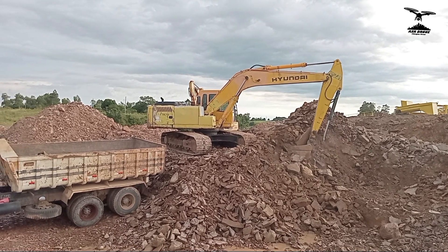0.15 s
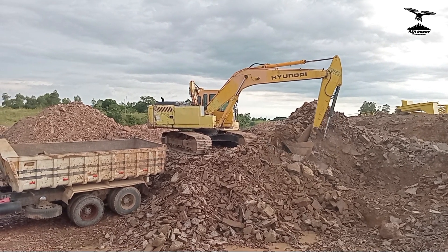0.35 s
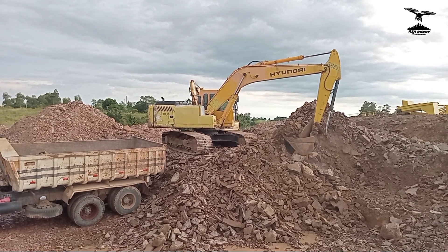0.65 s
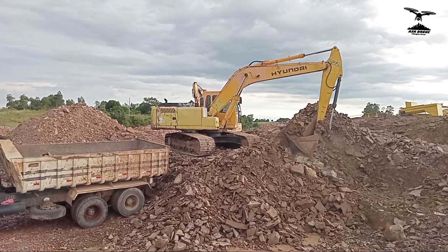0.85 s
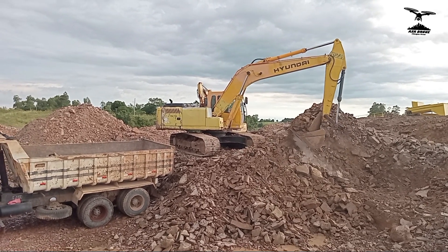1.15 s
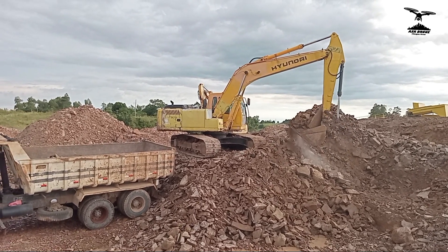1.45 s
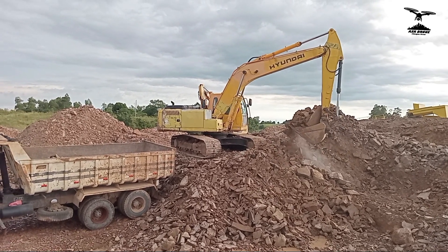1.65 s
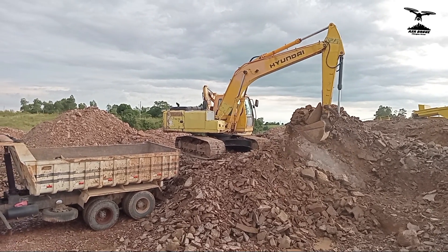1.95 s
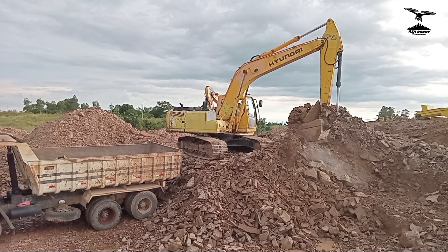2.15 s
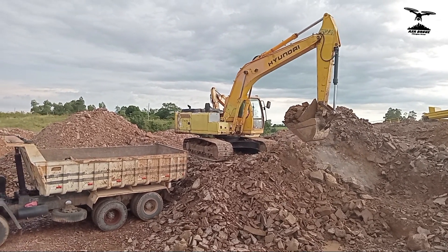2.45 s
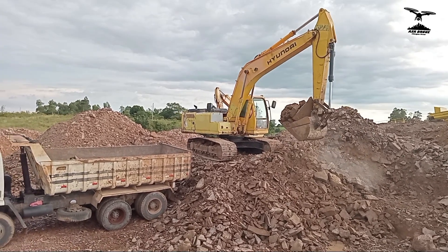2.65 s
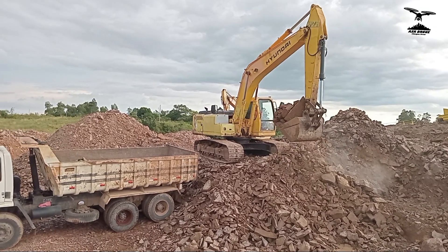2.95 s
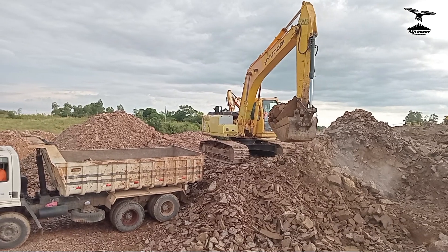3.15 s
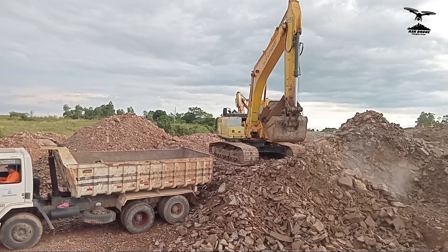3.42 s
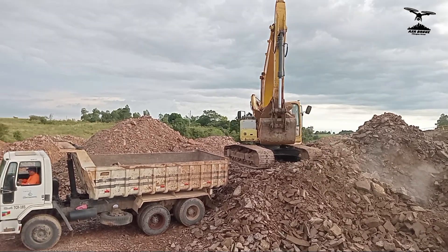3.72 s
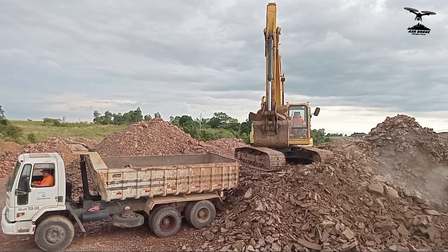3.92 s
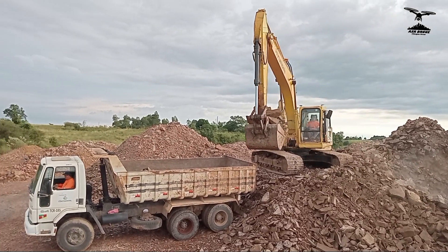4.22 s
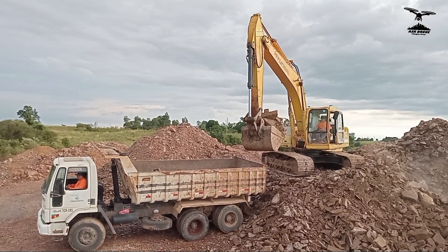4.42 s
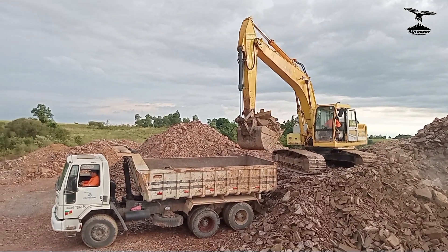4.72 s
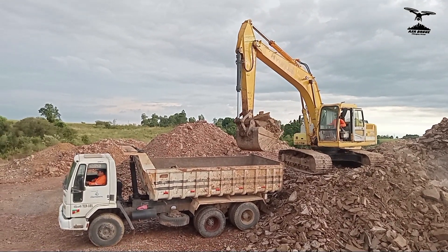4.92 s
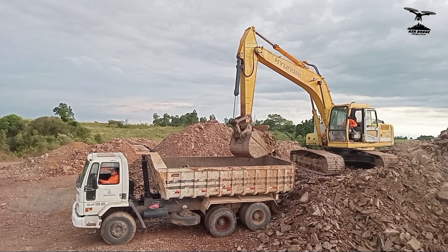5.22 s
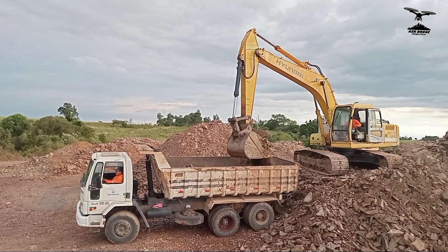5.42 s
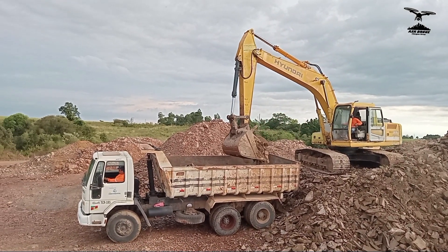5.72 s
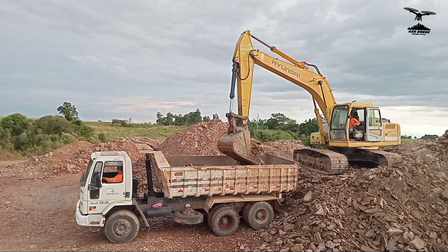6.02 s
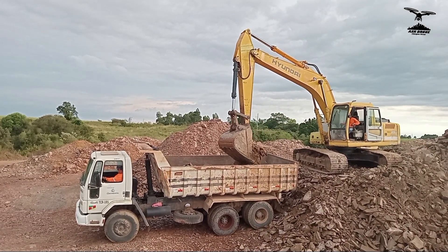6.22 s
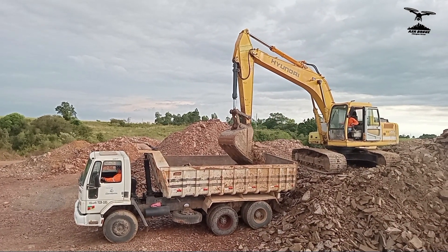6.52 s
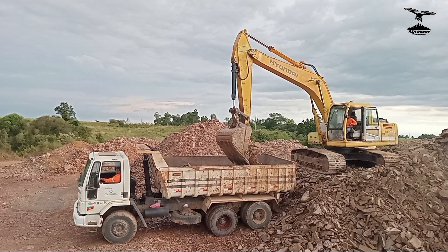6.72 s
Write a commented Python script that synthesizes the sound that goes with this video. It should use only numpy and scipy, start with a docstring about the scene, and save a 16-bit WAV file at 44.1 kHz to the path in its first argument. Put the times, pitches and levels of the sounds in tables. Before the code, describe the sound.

A mono, fairly distant outdoor view of a quarry, with a short ground echo and brief scatter off rock. From 0 s a dull, lumpy diesel rumble with an unsteady low hum and thin hydraulic whine lies beneath gravel trickling and stones shifting in a ringing steel bucket. A sharp clink comes at 0.6 s, more clinks and cracks around 0.9-1.2 s, then a dense bright flurry at 2.25-2.45 s. The whine fades by about 2.9 s; spilling thins to isolated clicks through 4.3 s, leaving mostly weak engine noise, with a knock near 4.9 s. From about 5.4 s rock pours loudly into a steel truck bed: crunching, clattering, plates clanging, booms near 5.65 and 6 s. It slackens around 6.2-6.5 s, then a heavy bang at 6.6 s and further tumbling knocks near 6.8 s finish.

```python
"""Stones clink and crack as an excavator lifts broken rock, swings round and tips it into a steel truck bed.
Each clink is a brief wavering tone, each crack a burst of random knocks; then the load roars down,
made of many knocks that ring stones and steel plates. Behind it: the ringing bucket, trickling gravel,
a dull diesel rumble made of filtered noise, and a thin pump whine.
All of it is heard from some way off, with an echo off the ground."""
import sys
import numpy as np
from scipy import signal
from scipy.io import wavfile

SR = 44100
rng = np.random.default_rng(int(sys.argv[2]) if len(sys.argv) > 2 else 0)


def to_wav(s):
    """Save 16-bit WAV."""
    ch = np.atleast_2d(s).T  # columns
    pcm = np.round(np.clip(ch, -1, 1) * 32767)  # PCM
    wavfile.write(sys.argv[1], SR, pcm.astype(np.int16))


N = 302967  # length of the scene in samples


def from_db(db):
    """Turn decibels into a gain."""
    return 10 ** (np.asarray(db) / 20)


def rms_one(x):
    """Scale a sound to unit power."""
    return x / np.sqrt(np.mean(x ** 2) + 1e-30)


def in_time(rows):
    """Draw straight lines between timed rows: one curve for each column after the time."""
    times, *columns = np.transpose(rows)
    return np.array([np.interp(np.arange(N) / SR, times, column) for column in columns])


def at_hz(points, hz):
    """Read a table of pitch and level at any pitch, with pitch on a log axis."""
    table_hz, table_db = np.array(points).T[:2]
    return np.interp(np.log(hz), np.log(table_hz), table_db)


def resonate(x, hz, width_hz):
    """Make a sound ring at one pitch: a two-pole resonance, applied twice to be steeper."""
    r = np.exp(-np.pi * width_hz / SR)
    section = [1, 0, -1, 1, -2 * r * np.cos(2 * np.pi * hz / SR), r * r]
    return signal.sosfilt([section, section], x + 1e-18)


def band(x, low_hz, high_hz):
    """Keep only the pitches between two limits."""
    return signal.sosfilt(signal.butter(3, [low_hz, high_hz], "band", fs=SR, output="sos"), x)


def delayed(x, ms):
    """The same sound, later."""
    return np.interp(np.arange(N) - ms * SR / 1000, np.arange(N), x, left=0)


def flicker(spread_db, rate_hz, size):
    """A gain that wanders slowly and at random: smoothed noise, read as decibels."""
    r = np.exp(-80 * np.pi * rate_hz / SR)  # worked out at every 40th sample only
    noise = rng.standard_normal(size // 40 + 1002)
    slow = signal.lfilter([1], [1, -2 * r, r * r], noise)[1000:]
    return np.interp(np.arange(size) / 40, np.arange(len(slow)), from_db(spread_db * rms_one(slow)))


def collisions(size, per_s, spread_db):
    """Single-sample knocks at random times; a positive spread makes most small and a few large."""
    when, chance, sign = rng.random((round(per_s * size / SR), 3)).T
    height = from_db(spread_db * np.minimum(-np.log(chance), 4))
    out = np.zeros(size)
    out[(when * size).astype(int)] = height * np.sign(sign - .5)
    return out


def stones(size, pitches, per_s, spread_db, sharpness, patchy_db, shared):
    """Stones of every size, one row per pitch: own knocks, plus knocks felt by all, ring briefly."""
    everyone = collisions(size, per_s, spread_db)
    rows = []
    for hz in pitches:
        knocks = collisions(size, per_s, spread_db) + shared * everyone
        ring = rms_one(resonate(knocks, hz, hz / sharpness))
        rows.append(ring * flicker(patchy_db, 12.7, size))
    return np.array(rows)


# The loudest single stones and plates ringing:
# (time [s], pitch [Hz], peak level before wavering [dB], length [ms])
STONE_CLINKS = [(0.252, 862, -54.5, 42), (0.41, 1910, -49.5, 8.6), (0.568, 4030, -47.5, 9.6),
                (0.583, 835.7, -28, 30), (0.635, 940, -47, 12), (0.825, 1810, -49.5, 10),
                (0.944, 1450, -33.5, 19), (0.962, 3390, -46, 6.6), (0.965, 2130, -46, 5.1),
                (0.99, 1900, -50, 12), (1.007, 5020, -53.5, 11), (1.034, 8250, -59.5, 7.5),
                (1.054, 3263, -38, 10.5), (1.06, 720, -47, 11), (1.105, 705, -53.5, 13),
                (1.109, 3300, -55, 12), (1.12, 1905, -50, 14), (1.135, 2110, -55, 15),
                (1.207, 3470, -48, 10.5), (1.225, 3920, -57, 10), (1.242, 2114, -55, 24),
                (1.271, 209, -51, 24), (1.485, 2025, -42, 16), (1.565, 218, -51, 12),
                (1.591, 4000, -53.5, 11.5), (1.615, 6140, -54, 22), (1.64, 5920, -50, 5.7),
                (1.916, 3480, -47, 8.3), (2.08, 8840, -60, 5.4), (2.139, 2718, -44.5, 9.7),
                (2.16, 4030, -55, 9), (2.183, 1737, -44, 7.9), (2.254, 11300, -46, 3.6),
                (2.259, 1300, -33.5, 2.2), (2.27, 917, -41, 8.3), (2.282, 2590, -36.5, 7),
                (2.283, 3630, -42.5, 13), (2.289, 2493, -33, 14.6), (2.303, 5050, -50, 9.4),
                (2.304, 4100, -50, 10), (2.31, 3710, -44, 12), (2.312, 2500, -49, 13),
                (2.324, 6800, -57, 12), (2.328, 1874, -42, 8.3), (2.331, 2910, -47, 12),
                (2.345, 1480, -45, 5.3), (2.342, 2560, -38.5, 9.1), (2.349, 2904, -32.5, 11),
                (2.355, 11500, -53, 6.2), (2.374, 150, -53, 14), (2.388, 3520, -56, 16),
                (2.408, 5400, -58, 16), (2.41, 2880, -55, 11), (2.408, 1966, -40.5, 12),
                (2.425, 175, -48, 10), (2.426, 1990, -51, 26), (2.438, 2410, -39.5, 5.8),
                (2.498, 2030, -52, 6.7), (2.513, 2000, -59, 6.1), (2.549, 2030, -41.5, 11),
                (2.553, 4130, -56, 5.6), (2.56, 2100, -52, 12), (2.605, 5760, -60, 26),
                (2.625, 6870, -47, 6.3), (2.634, 3690, -61, 16), (2.693, 5150, -65, 13),
                (2.764, 6560, -56.5, 5.4), (2.789, 14700, -58, 4), (2.8, 3564, -40.5, 8.1),
                (2.802, 1890, -42, 6.1), (2.837, 2030, -49.5, 12), (2.974, 2790, -50, 8.5),
                (3.04, 920, -54.5, 9.7), (3.045, 400, -53, 6), (3.107, 153, -46, 23),
                (3.114, 1540, -46, 4.4), (3.17, 3980, -50.5, 4.5), (3.221, 1887, -46, 7),
                (3.455, 4287, -54, 32), (3.515, 4280, -53, 4.6), (3.588, 14440, -50, 4.4),
                (3.642, 5100, -57, 9.7), (3.665, 1670, -56, 3.2), (3.665, 4300, -39, 6.7),
                (3.678, 4190, -57, 13), (3.681, 5880, -56.5, 8.2), (3.682, 5100, -55, 11),
                (3.768, 1680, -62.5, 5.7), (3.784, 3370, -59, 6.6), (3.945, 1810, -54, 4.3),
                (4.02, 2030, -61, 5.3), (4.078, 3520, -57.5, 7.9), (4.111, 172, -47.5, 5.4),
                (4.139, 8130, -58, 2), (4.199, 4570, -58, 7.5), (4.215, 4430, -60, 12),
                (4.217, 1820, -44, 2.5), (4.218, 3240, -55, 6), (4.771, 586, -55.5, 11.4),
                (4.869, 820, -52, 25), (4.869, 1626, -40, 17), (5.287, 1240, -49, 16),
                (5.432, 3530, -37, 7), (5.45, 1337, -34.5, 7.1), (5.454, 192, -36, 7.8),
                (5.487, 2390, -38, 12), (5.491, 3370, -34.5, 7.9), (5.529, 264, -38, 7.8),
                (5.538, 1236, -35.5, 10), (5.628, 631, -36, 23), (5.699, 738, -34, 16),
                (5.757, 1190, -37, 5.4), (5.83, 750, -38, 9.5), (5.835, 433, -33, 27),
                (5.885, 421, -34, 27), (5.974, 245, -30.5, 8.5), (6.0, 1245, -43, 20),
                (6.021, 1680, -38.5, 4.2), (6.021, 3230, -39.5, 8), (6.115, 1840, -33.5, 4.9),
                (6.117, 3486, -34.5, 5.7), (6.145, 1935, -49.5, 39), (6.162, 787, -38, 8.8),
                (6.168, 6130, -58, 8), (6.218, 4100, -56, 9.4), (6.27, 4780, -56, 6.8),
                (6.302, 412, -47, 20), (6.324, 3460, -48, 17), (6.334, 2335, -56, 18),
                (6.338, 3930, -50, 4.8), (6.357, 2920, -41.5, 8.7), (6.36, 1310, -52, 14),
                (6.366, 2380, -47, 8.9), (6.4, 9360, -56, 5), (6.455, 868, -43.5, 15),
                (6.477, 1520, -39, 7.3), (6.55, 740, -39, 5.6), (6.555, 1645, -38, 12),
                (6.575, 235, -34.5, 9.2), (6.625, 748, -33, 9), (6.688, 183, -36.5, 23),
                (6.7, 735, -40, 25), (6.781, 1910, -35, 12), (6.786, 2770, -45, 7.4),
                (6.801, 1250, -35.5, 8.8), (6.815, 9500, -56, 6.6)]


def clinks(rows):
    """Each stone rings on one pitch, swells and dies; chattering contact makes the ring waver."""
    out = np.zeros(N + SR)
    waver = flicker(1.76, 79, N + SR)
    wobble = np.log(flicker(2.9, 78, N + SR))  # radians
    for s, hz, db, ms in rows:
        t = np.arange(int(ms * SR / 250)) / SR  # four lengths, to let it die away
        start = round((s - .0025) * SR)  # begins 2.5 ms before the listed time
        swell = t / (0.00027 * ms)
        shape = swell ** 2.21 * np.exp(.45 - swell)  # peak close to 1
        chatter = np.sqrt(hz / 2000) * wobble[start:start + len(t)]  # small stones chatter more
        out[start:start + len(t)] += from_db(db) * shape * np.sin(2 * np.pi * hz * t + chatter)
    return (waver * out)[:N]


FAINT_CLINKS_PER_S, FAINT_UNTIL_S = 12, 4.3
FAINT_OVER_GRAVEL_DB, FAINT_SPREAD_DB = 0, 3.5  # the spread goes both up and down
FAINT_LOW_HZ, FAINT_HIGH_HZ, FAINT_MEAN_MS = 1800, 7870, 14.2
FAINT_LOSS_DB = 5  # the highest are this much weaker than the lowest


def faint_clinks():
    """Chance rows like those of the loud clinks, with levels that follow the spilling gravel."""
    when, pitch, strength, length = rng.random((round(FAINT_CLINKS_PER_S * FAINT_UNTIL_S), 4)).T
    s = 0.0046 + when * FAINT_UNTIL_S
    gravel_db = in_time(GRAVEL_LEVEL)[0][(s * SR).astype(int)]
    chance_db = FAINT_SPREAD_DB * (2 * strength - 1)
    db = gravel_db + FAINT_OVER_GRAVEL_DB + chance_db - FAINT_LOSS_DB * pitch
    hz = FAINT_LOW_HZ * (FAINT_HIGH_HZ / FAINT_LOW_HZ) ** pitch
    return list(zip(s, hz, db, FAINT_MEAN_MS * (.5 + length)))


# Dry cracks of rock on rock or steel:
# (time [s], base level [dB], brightness [dB per octave], base time to fade by 60 dB [s])
ROCK_CRACKS = [(0.188, -64, -15.5, 0.077), (0.774, -58, -4.5, 0.1), (0.931, -54.5, -1.5, 0.13),
               (0.961, -53, -2, 0.1), (1.033, -49.5, 7.5, 0.031), (1.161, -65, -4, 0.19),
               (1.39, -72, -16, 0.089), (1.582, -56, -17, 0.017), (1.612, -64.5, 5, 0.074),
               (1.817, -63.5, 6, 0.4), (1.934, -53.5, 6.5, 0.053), (2.074, -52, 10.5, 0.04),
               (2.227, -70, -23.5, 0.039), (2.259, -57, -11.5, 0.039), (2.303, -52.5, -1, 0.44),
               (2.517, -61, 6, 0.11), (2.551, -52.5, 4, 0.077), (2.597, -48, -11.5, 0.024),
               (2.746, -53, 3.5, 0.065), (2.926, -71, 17, 0.026), (3.03, -67.5, 11.5, 0.092),
               (3.107, -51, -2, 0.041), (3.166, -51.5, 4, 0.045), (3.576, -58.5, 9.5, 0.037),
               (3.661, -48, 1, 0.024), (3.866, -49, 3, 0.029), (3.877, -48, 4, 0.028),
               (3.913, -56.5, 6, 0.045), (4.04, -71, 15.5, 0.032), (4.097, -62.5, 7, 0.045),
               (4.197, -65, 4, 0.037), (4.214, -58, 10, 0.045), (4.238, -73, 21, 0.028),
               (4.743, -75.5, -18.5, 0.15), (4.867, -50.5, -11, 0.23), (5.376, -55.5, 9.5, 0.12),
               (5.401, -42.5, 8, 0.047), (5.45, -44, -9, 0.1), (5.491, -36.5, 3.5, 0.072),
               (5.569, -39.5, 7.5, 0.1), (5.792, -38.5, 0.5, 0.12), (6.043, -49, 6, 0.18),
               (6.115, -55.5, 12, 0.028), (6.318, -52, 3, 0.079), (6.336, -53, 1, 0.076),
               (6.356, -53, 0, 0.1), (6.372, -60, -3, 0.05), (6.4, -62, 14, 0.054), (6.45, -57, -13, 0.061),
               (6.526, -54.5, -15, 0.067), (6.583, -41.5, -8, 0.06), (6.653, -39, 4.5, 0.089),
               (6.782, -39.5, -5.5, 0.14)]
# Low, middle and treble part of a crack: (distance from the middle [octaves])
CRACK_PARTS = [-1.5, 0, 1.7]
CRACK_HUMP_DB = 5.5  # loss one octave off the middle, growing with the square


def cracks():
    """Bursts of grit that also ring many small stones at once; the higher, the sooner they die."""
    bursts = np.zeros((3, N + SR))
    t = np.arange(SR // 2) / SR
    lasting = np.array([[1.6], [1.1], [.55]])  # stretches the base fade: low, middle, treble
    octaves = np.c_[CRACK_PARTS]
    for s, db, bright_db, fade_s in ROCK_CRACKS:
        levels_db = db + bright_db * octaves - CRACK_HUMP_DB * octaves ** 2
        fall_db = 60 * t / (lasting * max(fade_s, .01))
        attack = 1 - np.exp(-t / 0.0035)
        bursts[:, round(s * SR):][:, :len(t)] += attack * from_db(levels_db - fall_db)
    out = np.zeros(N)
    for burst, (low, high) in zip(bursts, [(450, 1740), (1500, 4630), (4800, 13000)]):
        grit = rms_one(band(collisions(N, per_s=2800, spread_db=3.0), low, high))
        chips = np.zeros(N)
        for hz in np.geomspace(1.1 * low, min(high, 9500) / 1.1, num=12):
            chips += rms_one(resonate(collisions(N, per_s=80, spread_db=4.0), hz, 20 + hz / 110))
        out += burst[:N] * (0.98 * grit + 1.24 * rms_one(chips))
    return out


# Sharp snaps of stone edges: (time [s], pulse height before filtering [dB])
EDGE_SNAPS = [(2.259, -40), (2.283, -23), (2.29, -26), (2.303, -15), (2.351, -29), (2.598, -49),
              (2.803, -23), (4.216, -27), (5.703, -15), (5.733, -12), (6.021, -27), (6.582, -20),
              (6.628, -18), (6.8, -18)]


def snaps():
    """One short pulse each, with the lowest and highest pitches filtered off twice."""
    out = np.zeros(N)
    for s, db in EDGE_SNAPS:
        out[round(s * SR)] = from_db(db)
    return band(band(out, 620, 4900), 620, 4900)


# Colour of the falling load: (pitch [Hz], relative level [dB])
LOAD_COLOUR = [(70, -42), (120, -16.5), (200, -4), (450, -8), (750, -3), (1600, -3), (3300, 0), (6000, 4.5),
               (9000, 0), (12500, -1.5), (15000, -11)]
# Steel plates of the truck bed: (pitch [Hz], width of one filter pass [Hz], relative level [dB])
BED_PLATES = [(192.3, 27, -2.5), (259, 63, 0), (430, 42, -7.5), (704, 76, 2), (838, 85, 1.5),
              (1245, 135, -2.5), (1890, 230, -0.5), (2904, 150, -1), (3444, 170, 5), (3980, 70, 1.5),
              (4530, 58, -1)]
# The load sliding out: (time [s], level [dB], loss in the treble [dB])
LOAD_FLOW = [(5.25, -70, 62), (5.308, -66.5, 69), (5.37, -74, 49), (5.402, -56.5, 30), (5.44, -56.5, 22),
             (5.456, -49.5, 16.5), (5.54, -49, 18.5), (5.565, -52.5, 20), (5.646, -47, 25), (5.8, -48, 26),
             (6.02, -51.5, 27), (6.08, -55, 32), (6.166, -52.5, 37), (6.256, -77, 6.5), (6.33, -61.5, 26),
             (6.38, -63, 38), (6.41, -77.5, 17), (6.455, -57.5, 31), (6.504, -72.5, 29), (6.555, -56, 23),
             (6.584, -48.5, 12.5), (6.65, -55, 40), (6.77, -56, 32), (6.79, -51.5, 19), (6.87, -53.5, 26.5)]
# Deep boom of the bed: (time [s], level [dB])
BED_BOOM = [(5.25, -56), (5.36, -76), (5.41, -56), (5.58, -60.5), (5.65, -48.5), (5.8, -60.5), (5.99, -48),
            (6.15, -73.5), (6.26, -66.5), (6.5, -71.5), (6.58, -42), (6.64, -53.5), (6.72, -45.5),
            (6.87, -49)]
CLANG_HZ, TREBLE_HZ, BOOM_HZ = 1000, 9000, 220
DULLING_POWER = 1.92  # treble loss grows as this power of the octaves above the clang


def dump():
    """The load pours out: thousands of knocks a second ring the stones and the plates of the bed."""
    start = round(LOAD_FLOW[0][0] * SR)
    size = N - start
    flow_db, loss_db = in_time(LOAD_FLOW)[:, start:]
    boom_db = in_time(BED_BOOM)[0, start:]
    pitches = np.geomspace(80, 15000, 70)
    rows = list(stones(size, pitches, per_s=330, spread_db=2.5, sharpness=20.0, patchy_db=2.0, shared=0.68))
    voices = [(hz, at_hz(LOAD_COLOUR, hz)) for hz in pitches]
    for hz, width_hz, db in BED_PLATES:
        rows.append(rms_one(resonate(collisions(size, per_s=130, spread_db=3.0), hz, width_hz)))
        voices.append((hz, db))
    out = np.zeros(N)
    for row, (hz, db) in zip(rows, voices):
        # deep voices follow the boom, those above the clang follow the flow, the rest a blend
        boomy = np.clip(np.log(CLANG_HZ / hz) / np.log(CLANG_HZ / BOOM_HZ), 0, 1)
        height = np.clip(np.log(hz / CLANG_HZ) / np.log(TREBLE_HZ / CLANG_HZ), 0, 1)
        level_db = boomy * boom_db + (1 - boomy) * flow_db - height ** DULLING_POWER * loss_db
        out[start:] += row * from_db(db + level_db)
    fade_in = np.minimum(np.arange(size) / (0.011 * SR), 1)
    out[start:] *= fade_in * flicker(1.07, 41, size)  # it comes in lumps
    return out


# Steel of the bucket: (pitch [Hz], width of one filter pass [Hz], relative level [dB])
BUCKET_STEEL = [(732, 58, -2.5), (840, 69, -5), (1226, 81, -5.5), (1620, 57, -4.5), (1890, 120, -1),
                (2007, 27, -9), (2760, 170, -6), (3310, 32, -12.5), (3506, 86, -7.5), (3970, 43, -12),
                (4420, 90, -10), (5030, 60, -29), (6190, 150, -16), (7070, 99, -23)]
# Stones shifting in the bucket, most while it is filled: (time [s], level [dB])
BUCKET_LEVEL = [(0.0, -70), (1.0, -56.5), (1.9, -74), (2.3, -78), (2.8, -67.5), (4.0, -80), (5.3, -73.5)]


def bucket():
    """Stones shifting in the bucket set its steel ringing, one pitch now, another then."""
    rings = np.zeros(N)
    for hz, width_hz, db in BUCKET_STEEL:
        ring = rms_one(resonate(collisions(N, per_s=140, spread_db=2.0), hz, width_hz))
        rings += from_db(db) * flicker(5.7, 7.7, N) * ring
    return from_db(in_time(BUCKET_LEVEL)[0]) * rms_one(rings)


# Colour of the gravel: (pitch [Hz], relative level per Hz [dB])
GRAVEL_COLOUR = [(560, 0.5), (740, -0.5), (1500, -3.5), (2400, -8.5), (3600, -10), (6300, -15.5),
                 (8000, -25), (10000, -28), (15000, -47)]
# Gravel spilling from the bucket: (time [s], level of the trickle [dB])
GRAVEL_LEVEL = [(0.0, -64.5), (0.5, -63.5), (1.0, -62), (1.9, -62), (2.4, -59.5), (2.6, -63.5), (3.3, -66),
                (3.9, -72.5), (4.3, -73), (5.3, -71.5)]


def gravel():
    """Fine stuff trickles from the bucket and down the pile; now and then a grain ticks brightly."""
    pitches = np.geomspace(550, 15000, 26)
    rows = stones(N, pitches, per_s=1500, spread_db=1.0, sharpness=5.8, patchy_db=3.0, shared=0.15)
    gains = from_db(at_hz(GRAVEL_COLOUR, pitches)) * np.sqrt(pitches)  # higher bands are wider
    trickle = rms_one(gains @ rows)
    ticks = rms_one(band(collisions(N, per_s=33, spread_db=0.5), 6500, 15500))
    rustle = rng.standard_normal(400) * np.exp(-np.arange(400) / 90.0)  # draws out each tick
    ticks = rms_one(signal.fftconvolve(ticks, rustle)[:N])
    return from_db(in_time(GRAVEL_LEVEL)[0]) * (trickle + from_db(-23) * ticks)


# Colour of the diesel rumble: (pitch [Hz], relative level per Hz [dB])
RUMBLE_COLOUR = [(45, -17), (115, -5.5), (189, 3), (267, 0), (400, -5), (465, -12.5), (557, -3.5),
                 (647, -5), (823, -13.5), (900, -16)]
# The diesel's hum wavers on three pitches:
# (pitch [Hz], width of one filter pass [Hz], level against the rumble [dB])
ENGINE_HUM = [(200.7, 10, -9), (257.2, 12, -12.5), (346.2, 14, -18)]
# Level of the diesel, dipping as the machine swings: (time [s], level of the rumble [dB])
ENGINE_LEVEL = [(0.0, -60), (1.0, -63), (1.6, -59.5), (2.3, -63.5), (3.0, -60), (3.5, -66.5), (4.4, -65.5),
                (5.2, -63)]


def engine():
    """Far diesel: noise in bands about a third of an octave apart, each lumpy, and an unsteady hum."""
    white = rng.standard_normal((3, N))
    rumble = np.zeros(N)
    for k, hz in enumerate(np.geomspace(45, 900, 15)):
        noise = rms_one(resonate(white[k % 2], hz, hz / 2.87))
        gain = from_db(at_hz(RUMBLE_COLOUR, hz)) * np.sqrt(hz)  # higher bands are wider
        rumble += noise * gain * flicker(0.78, 9.6, N)
    hum = sum(from_db(db) * rms_one(resonate(white[2], hz, width_hz)) for hz, width_hz, db in ENGINE_HUM)
    return from_db(in_time(ENGINE_LEVEL)[0]) * (rms_one(rumble) + hum)


# Thin whine of the hydraulic pump while the arm lifts:
# (time [s], pitch [Hz], level of the lowest tone before flicker [dB])
PUMP_WHINE = [(0, 276.2, -67.5), (1.0, 276.8, -68.5), (1.7, 274, -73), (2.6, 273.7, -72.5), (2.9, 280, -97)]


def pump():
    """A tone and its third multiple, both a little unsteady in level, and a faint fourth."""
    hz, level_db = in_time(PUMP_WHINE)
    phase = 2 * np.pi * np.cumsum(hz) / SR
    tone = np.sin(phase) * flicker(3.0, 4.9, N)
    tone += from_db(-1.5) * np.sin(3 * phase) * flicker(3.3, 5.0, N)
    tone += from_db(-5.5) * np.sin(4 * phase)
    return from_db(level_db) * tone


SCATTER_DB, SCATTER_T60_S = -4, 0.095  # level before the treble is dulled; time to fade by 60 dB


def scattered(blows):
    """Blows scatter back from pile and truck: many fading copies, dulled in the treble."""
    t = np.arange(SR // 5) / SR
    fade = (t > .006) * from_db(-60 * t / SCATTER_T60_S)
    copies = collisions(len(t), per_s=770, spread_db=-2.5) * fade
    copies = from_db(SCATTER_DB) * copies / np.sqrt(np.sum(copies ** 2))
    return signal.lfilter([.35], [1, -.7], signal.fftconvolve(blows, copies)[:N])


GROUND_ECHO_MS, GROUND_ECHO_GAIN = 1.994, -0.13


def scene():
    """Add up all the sources; everything gets a slightly dull, upside-down echo off the ground."""
    blows = clinks(STONE_CLINKS + faint_clinks()) + cracks() + snaps()
    direct = blows + scattered(blows) + dump() + bucket() + gravel() + engine() + pump()
    echo = signal.lfilter([.7], [1, -.3], delayed(direct, GROUND_ECHO_MS))
    return (direct + GROUND_ECHO_GAIN * echo)[None]


# Microphone colour: (pitch [Hz], level [dB])
MICROPHONE_COLOUR = [(6000, -3.5), (7600, -4.5), (9200, -1.5), (10500, -8.5), (12500, -23), (14000, -25),
                     (15000, -0.5)]
BASS_CUT_HZ, TOP_CUT_HZ = 101, 15800
HISS_DB = -95.5  # before the top is cut


def record(dry):
    """Microphone colour, bass cut and a faint hiss; the top is cut."""
    hz = np.linspace(0, SR / 2, 129)
    # decibels are doubled because minimum_phase halves them
    colour = signal.firwin2(255, hz, from_db(2 * at_hz(MICROPHONE_COLOUR, hz + 1)), fs=SR)
    coloured = signal.fftconvolve(dry[0], signal.minimum_phase(colour))[None, :N]
    thin = signal.sosfilt(signal.butter(3, BASS_CUT_HZ, "high", fs=SR, output="sos"), coloured)
    hiss = from_db(HISS_DB) * rng.standard_normal(dry.shape)
    return signal.sosfilt(signal.cheby2(12, 60, TOP_CUT_HZ, fs=SR, output="sos"), thin + hiss)


dry = scene()
out = record(dry)
to_wav(out)
```